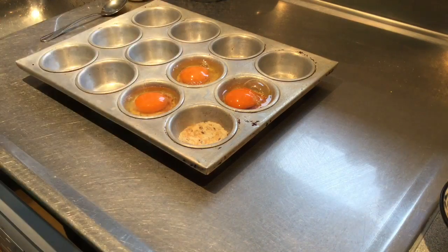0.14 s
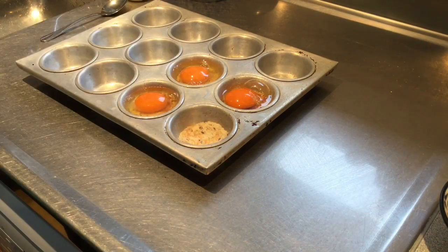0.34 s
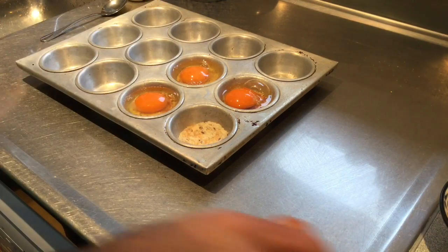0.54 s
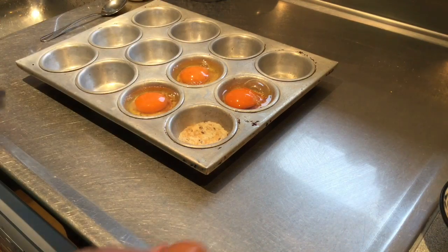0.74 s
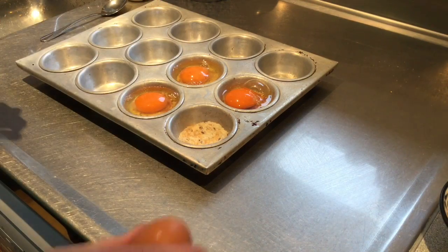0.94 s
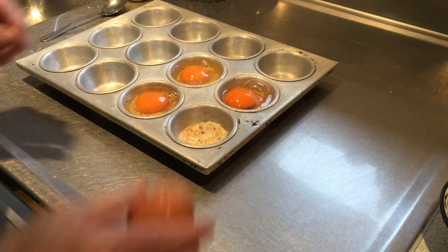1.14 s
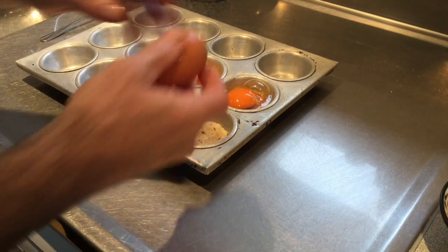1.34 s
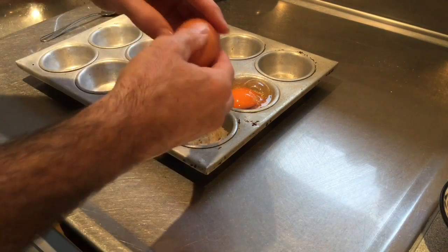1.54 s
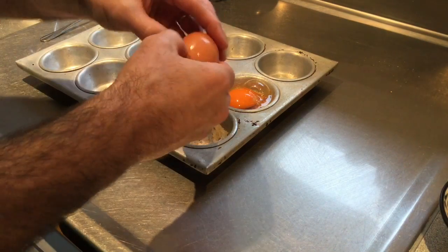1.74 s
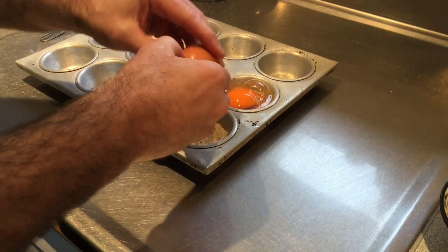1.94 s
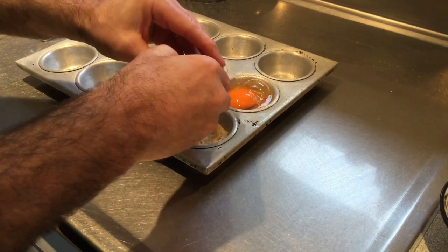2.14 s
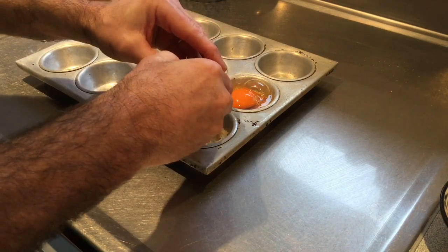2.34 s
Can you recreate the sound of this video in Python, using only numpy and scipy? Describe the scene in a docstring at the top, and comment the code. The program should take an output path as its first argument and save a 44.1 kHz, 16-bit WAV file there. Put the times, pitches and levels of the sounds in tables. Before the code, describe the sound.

Egg cracking on a metal bench, heard close in a small, lively kitchen: hollow shell bounces in a ringing bin, brief rustle, two solid knocks with low ringing, then delicate shell crackles and one louder split over quiet hum.

```python
"""A kitchen with a steel bench, where an appliance hums. An empty eggshell is tossed into a bin, bounces and
settles; a fresh egg is picked up and knocked twice on the bench, then thumbs press until its shell splits.
Shell sounds are runs of tiny random clicks, shaped by filters; the bin, bench and egg ring as sets of fading
tones; skin, hum and room tone are filtered noise. The room answers with noise that dies away."""
import sys
import numpy as np
from scipy import signal
from scipy.io import wavfile

SR = 44100
rng = np.random.default_rng(int(sys.argv[2]) if len(sys.argv) > 2 else 0)


def unload_wav(signal):
    """Save mono or channel-first audio to the path in sys.argv[1] as 16-bit WAV at rate SR, clipped to [-1, 1]."""
    wavfile.write(
        sys.argv[1],
        SR,
        np.round(np.clip(np.atleast_2d(signal).T, -1, 1) * 32767).astype(np.int16),
    )


N = 105840   # length in samples: 2.4 s
EDGES = 24 * 2 ** np.arange(0, 9.6, .5)   # edges of the half-octave bands, Hz


def from_db(db):
    """Turn decibels into a gain."""
    return 10 ** (np.asarray(db) / 20)


def rms_one(x):
    """Scale a sound to an average (rms) level of one."""
    return x / np.sqrt(np.mean(x ** 2) + 1e-20)


def at_hz(points, hz):
    """Read a curve between its points, with frequency on a log axis."""
    point_hz, values = np.array(points).T
    return np.interp(np.log(hz), np.log(point_hz), values)


def bands(x):
    """Split a sound into half-octave bands, each given with its centre in Hz."""
    for low, high in zip(EDGES, EDGES[1:]):
        band_pass = signal.butter(2, [low, high], "band", fs=SR, output="sos")
        yield np.sqrt(low * high), signal.sosfilt(band_pass, x + 1e-18)


def colour(x, spectrum):
    """Weight the bands by a spectrum, scaled to roughly keep the power of white noise."""
    centres = np.sqrt(EDGES[1:] * EDGES[:-1])
    power = np.sum(from_db(at_hz(spectrum, centres)) ** 2 * np.diff(EDGES)) / (SR / 2)
    out = 0
    for k, (hz, band) in enumerate(bands(x)):
        sign = (-1) ** k   # neighbouring bands alternate in sign
        out = out + sign * from_db(at_hz(spectrum, hz)) * band
    return out / np.sqrt(power)


def ring(s, db, modes, spread_db=0.0):
    """A struck object rings as fading sine tones; each blow drives each tone with a random strength."""
    out, chance = 0, rng.standard_normal((len(s), len(modes)))
    blow_samples = (np.asarray(s) * SR).astype(int)
    for k, ((hz, level_db, t60), luck) in enumerate(zip(modes, chance.T)):
        decay = from_db(-60 / (t60 * SR))   # per sample
        turn = 2 * np.pi * hz / SR          # radians per sample
        clicks = np.full(N, 1e-18)
        clicks[blow_samples] = from_db(db + level_db + spread_db * luck)
        tone = signal.lfilter([0, np.sin(turn)], [1, -2 * decay * np.cos(turn), decay * decay], clicks)
        out = out + (-1) ** k * tone
    return out


RISE_S = 0.0014


def crunch(s, db, length, grit_db=1.5):
    """A quick-rising run of uneven tiny fractures, whose decay reaches -20 dB after the given length."""
    start, size = int(s * SR), 4096
    t = np.arange(size) / SR
    unevenness = np.minimum(rng.exponential(1, size), 4)
    run = rng.choice([-1., 1.], size) * from_db(grit_db * unevenness)
    envelope = from_db(db - 20 * t / length) * (1 - np.exp(-t / RISE_S))
    out = np.zeros(N + size)
    out[start:start + size] = envelope * run
    return out[:N]


def resonance(x, hz, width_hz):
    """Let through a peak around one frequency, keeping the power of a white input."""
    r = np.exp(-np.pi * width_hz / SR)
    peak = signal.lfilter([1, 0, -1], [1, -2 * r * np.cos(2 * np.pi * hz / SR), r * r], x)
    return np.sqrt((1 - r * r) / 2) * peak


# colour of the room tone: (frequency [Hz], relative level [dB per Hz])
AIR_COLOUR = [(15, -61), (25, -33), (41, -10), (70, -15), (102, -4), (223, -18.5), (301, -8.5),
              (335, -22.5), (439, -18.5), (734, -36), (1040, -34.5), (1440, -29.5), (1560, -34.5),
              (13200, -53), (16000, -50)]
AIR_DB = -61.5
# wavering hum: (frequency [Hz], width [Hz], level [dB])
HUM = [(96, 9.2, -61.5), (407, 45, -89), (1029, 25, -75.5)]


def background():
    """Steady noise makes the room tone; narrow bands of noise waver like an appliance's hum."""
    out = from_db(AIR_DB) * colour(rng.standard_normal(N), AIR_COLOUR)
    for hz, width_hz, db in HUM:
        out = out + from_db(db) * rms_one(resonance(rng.standard_normal(N), hz, width_hz))
    return out


# skin brushes shell or bench: (start [s], length [s], level [dB])
BRUSHES = [(0.0072, 0.025, -70.5), (0.82, .045, -52.5), (1.981, 0.024, -80), (0.5, 0.014, -66)]
# colour of the brushing: (frequency [Hz], relative level [dB per Hz])
BRUSH_COLOUR = [(880, -26), (1500, -13), (5040, -17.5), (5610, -7.5), (7300, -17), (8460, -3), (14300, -24),
                (15500, -40)]


def brushes():
    """Skin rubbing makes soft bright swishes: noise that swells and fades."""
    t, shape = np.arange(N) / SR, 0
    for s, length, db in BRUSHES:
        progress = np.clip((t - s) / length, 0, 1)
        shape = shape + from_db(db) * np.sqrt(np.sin(np.pi * progress).clip(0))
    return colour(shape * rng.standard_normal(N), BRUSH_COLOUR)


# ticks and snaps of shell, before the gains below:
# (time [s], level [dB], egg body relative to the snap [dB], bright centre [Hz])
SNAPS = [(0.1558, -52.5, -14, 6900), (1.6541, -56, -17, 8510), (1.8117, -45, -14, 8160),
         (1.842, -40.5, -13.5, 8370), (1.9511, -49, -14, 9050), (1.9564, -61.5, -5.5, 8940),
         (1.9824, -51, -33, 9880), (1.993, -48.5, -34, 8740), (2.0094, -53, -21, 9810),
         (2.351, -52.5, -20, 7630), (2.378, -25, -19.5, 13700)]
# colour of the snaps: (frequency [Hz], relative level [dB per Hz])
SNAP_COLOUR = [(1470, -40), (2500, -10.5), (4030, -12.5), (6020, -3.5), (7310, -10), (9570, -5.5),
               (11200, -12), (13000, -16), (15800, -6.5)]
# body of the held egg: (frequency [Hz], relative level [dB], time to fade by 60 dB [s])
EGG = [(480, -0.5, 0.022), (1047, -2, 0.0164), (1790, -1.5, 0.013), (2080, 1, 0.024), (5000, 4, 0.004)]
SNAP_S, SNAP_GAIN_DB, EGG_GAIN_DB = 0.0071, -10, 3.5
SNAP_PEAK_DB, SNAP_Q = -4.5, 7.2   # level and sharpness of each snap's own pitch


def snaps():
    """Shell breaks in short bright fractures, each with its own pitch, that tap the body of the egg."""
    fractures = 0
    for s, db, _, hz in SNAPS:
        grit = crunch(s, db + SNAP_GAIN_DB, SNAP_S)
        fractures = fractures + grit + from_db(SNAP_PEAK_DB) * resonance(grit, hz, hz / SNAP_Q)
    s, db, body_db, _ = np.transpose(SNAPS)
    body = ring(s, db + body_db + EGG_GAIN_DB, EGG, spread_db=7.5)
    return colour(fractures, SNAP_COLOUR) + body


# the tossed shell lands and bounces: (time [s], level [dB], clack centre [Hz], sharpness [Q],
# crack relative to the level [dB], length [s], blow on the bin [dB])
BOUNCES = [(0.2285, -14.5, 1930, 5.2, -9.5, 0.016, 1.5), (.2408, -16, 2110, 4.8, -9, 0.0021, -1.5),
           (0.255, -31.5, 2050, 5.9, -17, 0.031, -10.5), (0.283, -28.5, 2010, 6.7, -2, 0.0043, -10),
           (.287, -18.5, 1050, 2.8, -13, 0.015, -13), (0.302, -20, 1450, 3.4, -7, 0.004, -5.5),
           (0.332, -40.5, 2000, 7.3, -8, 0.028, -12), (0.369, -23.5, 305, 0.61, -23, 0.017, -21),
           (0.38, -24.5, 500, 0.76, -25, 0.013, -17), (0.392, -44, 700, 0.6, -6, .008, -31.5)]
# colour of cracking shell, also used by the knocks: (frequency [Hz], relative level [dB per Hz])
CRACK_COLOUR = [(470, -39), (800, -5), (1190, -16.5), (1850, 4), (2490, -8.5), (5140, -6), (6760, -4),
                (7290, -5.5), (14300, -7), (15800, -22)]
# what the bin rings with: (frequency [Hz], relative level [dB], time to fade by 60 dB [s])
BIN = [(135, -44, .3), (200, -41, 0.35), (350.6, -38.5, 0.73), (706, -52.5, 0.42), (864, -38, .2),
       (1066, -41, .6), (1307, -41.5, 0.36), (1443, -43.5, 0.36), (1569.5, -44, .2), (1810, -36.5, 0.25),
       (1942, -29.5, .05), (2070, -38.5, 0.11), (2132, -31.5, 0.51), (2460, -40, 0.4), (3210, -42.5, 0.16),
       (3770, -29, 0.053), (4290, -34.5, 0.046)]


def tossed_shell():
    """Each bounce is a hollow clack with a crack on top, and rings the bin: (impacts, ringing)."""
    impacts = 0
    for s, db, hz, sharp, crack_db, length, _ in BOUNCES:
        grit = crunch(s, db, length)
        clack = resonance(resonance(grit, hz, hz / sharp), hz, 2 * hz) * np.sqrt(4 * hz / SR)
        crack = from_db(crack_db) * colour(grit, CRACK_COLOUR)
        impacts = impacts + clack + crack
    s, *_, blow_db = np.transpose(BOUNCES)
    return impacts, ring(s, blow_db, BIN, spread_db=3.0) + tinkle()


# a small metal thing in the bin is touched: (time [s], level [dB])
TINKLES = [(.395, -40)]
# what it rings with: (frequency [Hz], relative level [dB], time to fade by 60 dB [s])
TINKLE = [(2298, -2, 0.71), (5184, -12, 0.27)]
TINKLE_SWELL_S, TINKLE_FADE_S = .03, 0.033
TINKLE_STOP_S = 0.683   # moment when the damping starts


def tinkle():
    """A small metal thing rings thinly: it swells out of the clatter and is then damped."""
    t = np.arange(N) / SR
    swell = np.clip((t - TINKLES[0][0]) / TINKLE_SWELL_S, 0, 1) ** 2
    damping = np.exp(-np.clip(t - TINKLE_STOP_S, 0, None) / TINKLE_FADE_S)
    return swell * damping * ring(*np.transpose(TINKLES), TINKLE)


# pieces rustle as they settle: (time [s], level [dB])
SETTLING = [(0.42, -39), (0.43, -50.5), (0.604, -61.5), (0.706, -52.5), (0.794, -67.5), (0.82, -54.5)]
# colour of the rustle: (frequency [Hz], relative level [dB per Hz])
SETTLE_COLOUR = [(88, -26), (150, 7.5), (292, -13.5), (345, 3), (465, -11), (1650, -2), (1790, -25.5),
                 (8000, -43), (10400, -76), (17600, -120)]
SETTLE_PER_S = 1500   # average grains per second


def settling():
    """Settling pieces rustle as many small random grains under a level curve."""
    s, db = np.transpose(SETTLING)
    grains = (rng.random(N) < SETTLE_PER_S / SR) * rng.standard_normal(N)
    level_db = np.interp(np.arange(N) / SR, s, db, left=-120, right=-120)
    return from_db(level_db) * rms_one(colour(grains, SETTLE_COLOUR))


# egg on bench; crack, thud and boom are relative to the level:
# (time [s], level [dB], shell crack [dB], body thud [dB], deep boom [dB], crack length [s])
KNOCKS = [(0.858, -15.5, -5, -3.5, -26, 0.0083), (1.093, -19.5, -0.5, -3, -12, 0.0087)]
# colour of the thud: (frequency [Hz], relative level [dB per Hz])
THUD_COLOUR = [(35, -35), (60, 0), (236, -1), (753, -14.5), (1030, 7.5), (2090, -30.5), (2360, -14.5),
               (3360, -23), (4000, -11), (5200, -35), (8800, -120)]
# what the bench rings with: (frequency [Hz], relative level [dB], time to fade by 60 dB [s])
BENCH = [(104.7, -21.5, 0.98), (130.2, -19.5, 0.44), (205, -21, 0.69), (225.7, -22, 0.57),
         (311.5, -22, 0.7), (350.5, -10.5, .2), (536, -20.5, 0.24), (633, -21.5, 0.44),
         (682.3, -18.5, 0.39), (1008, -23.5, 0.27), (1006, -6, 0.065), (1226, -19, 0.074),
         (1236, -25.5, 0.17), (2400, -6.5, 0.047), (4080, -8, 0.0095), (6430, -13, .02)]
# deep ringing of the cabinet: (frequency [Hz], relative level [dB], time to fade by 60 dB [s])
BOOM = [(51.4, -9, 0.6), (75, -32, .45), (96.8, -13, 0.27)]
THUD_LOW_HZ, BOOM_DELAY_S = 150, 0.018


def knocks():
    """A shell crack and a dull thud, then bench and cabinet ring on: (impacts, ringing)."""
    impacts, low_cut = 0, signal.butter(4, THUD_LOW_HZ, "high", fs=SR, output="sos")
    for s, db, crack_db, thud_db, _, length in KNOCKS:
        crack = colour(crunch(s, db + crack_db, length), CRACK_COLOUR)
        thud = colour(crunch(s + 0.00082, db + thud_db, 2 * length), THUD_COLOUR)
        impacts = impacts + crack + signal.sosfilt(low_cut, thud)
    s, db, _, _, boom_db, _ = np.transpose(KNOCKS)
    bench = ring(s + .001, db, BENCH, spread_db=1.5)
    return impacts, bench + ring(s + BOOM_DELAY_S, db + boom_db, BOOM)


# how long the room takes to die away: (frequency [Hz], time to fade by 60 dB [s])
ROOM_T60 = [(60, 0.17), (250, .45), (1000, 0.62), (3000, 0.37), (8000, 0.43), (15000, 0.23)]
# how strongly the room answers: (frequency [Hz], level relative to the sound fed in [dB])
ROOM_DB = [(60, 5.5), (250, -1.5), (1000, -6), (3000, -3.5), (8000, -4), (15000, 1.5)]
ROOM_DELAY_S = 0.0017


def kitchen(x):
    """The room stores the energy of each band and lets it die away as noise."""
    out, white = 0, [dict(bands(w)) for w in rng.standard_normal((2, N))]
    late = np.concatenate([np.zeros(int(ROOM_DELAY_S * SR)), x])[:N]
    for k, (hz, band) in enumerate(bands(late)):
        keep = from_db(-120 / (at_hz(ROOM_T60, hz) * SR))   # energy kept per sample: -60 dB over the t60
        energy = signal.lfilter([1 - keep], [1, -keep], band ** 2)
        noise = rms_one(white[k % 2][hz])   # neighbouring bands use different noise
        out = out + from_db(at_hz(ROOM_DB, hz)) * np.sqrt(energy) * noise
    return out


RING_ROOM_DB, SNAP_ROOM_DB = -5.5, -4   # how much of the ringing and the snaps is fed to the room


def scene():
    """Everything that is handled sounds in the room, over the background."""
    held = snaps()
    clack, bin_ring = tossed_shell()
    knock, bench_ring = knocks()
    handled = brushes() + clack + settling() + knock
    rings = bin_ring + bench_ring
    wet = kitchen(handled + from_db(RING_ROOM_DB) * rings + from_db(SNAP_ROOM_DB) * held)
    return (handled + rings + held + wet + background())[None]


MIC_LOW_HZ, CUTOFF_HZ = 45, 16400


def record(dry):
    """The microphone drops the lowest bass; the top of the treble is cut."""
    x = signal.sosfilt(signal.butter(2, MIC_LOW_HZ, "high", fs=SR, output="sos"), dry)
    return signal.sosfilt(signal.cheby2(12, 60, CUTOFF_HZ, fs=SR, output="sos"), x)


dry = scene()
out = record(dry)
unload_wav(out)
```